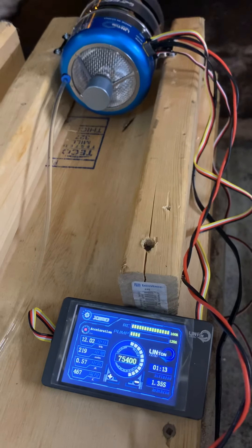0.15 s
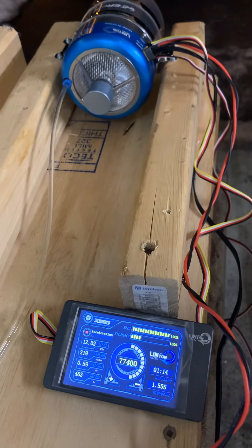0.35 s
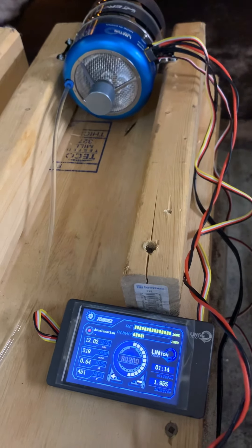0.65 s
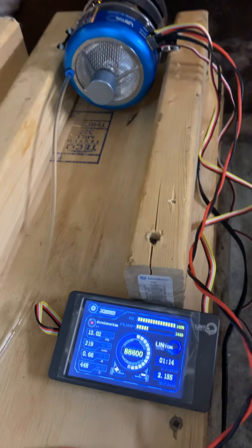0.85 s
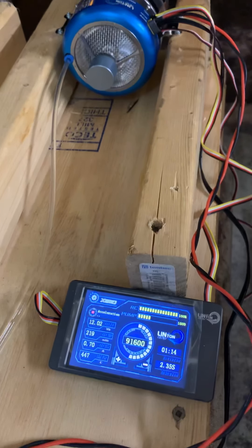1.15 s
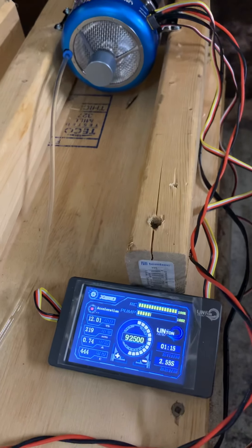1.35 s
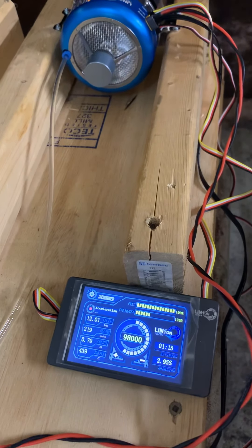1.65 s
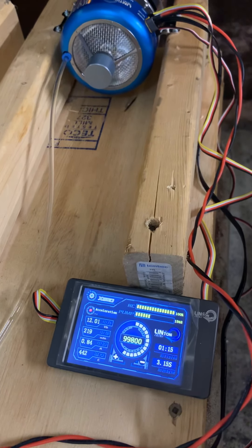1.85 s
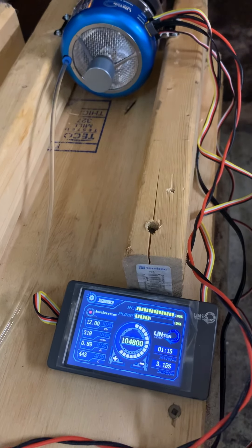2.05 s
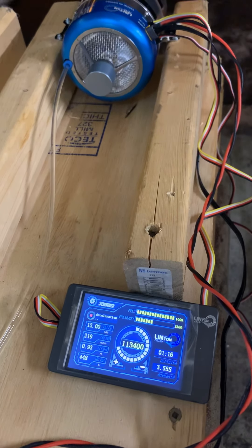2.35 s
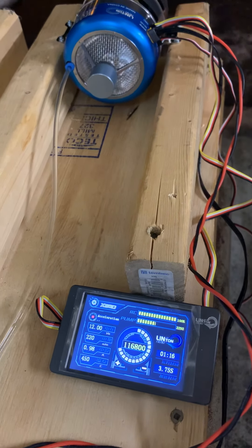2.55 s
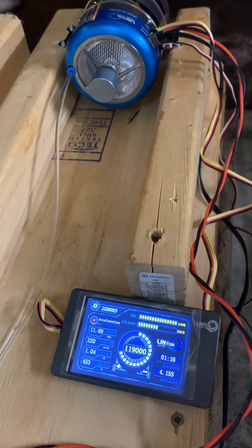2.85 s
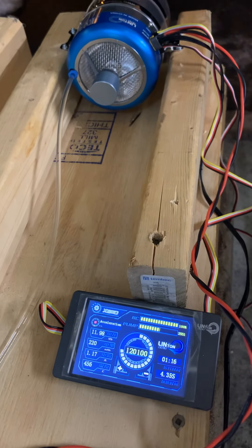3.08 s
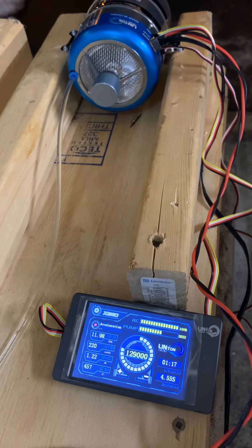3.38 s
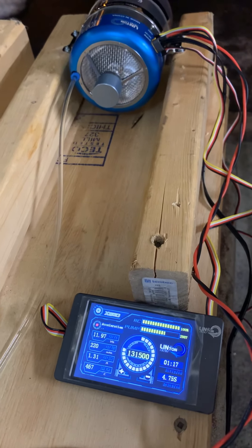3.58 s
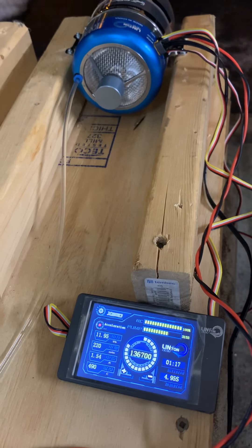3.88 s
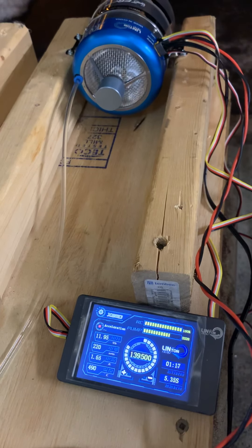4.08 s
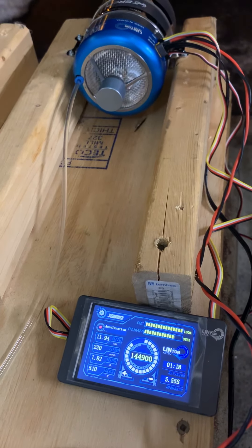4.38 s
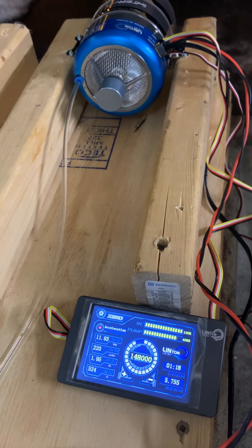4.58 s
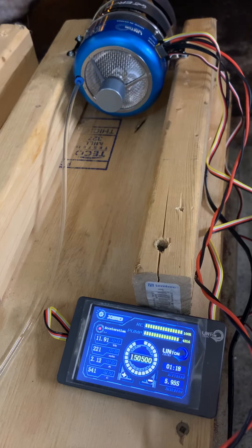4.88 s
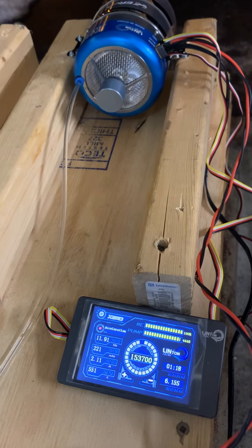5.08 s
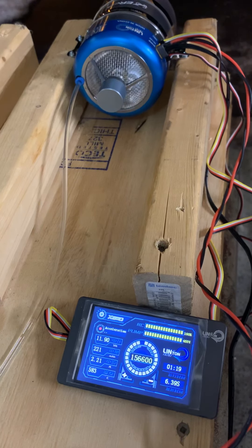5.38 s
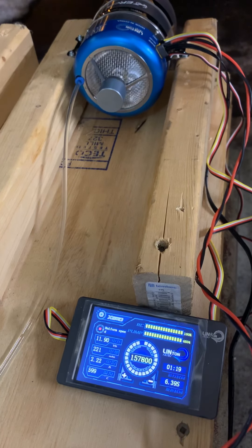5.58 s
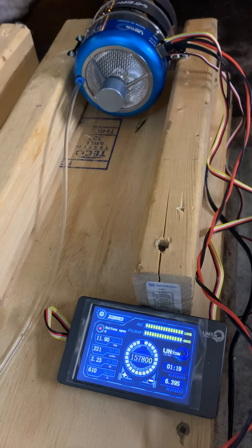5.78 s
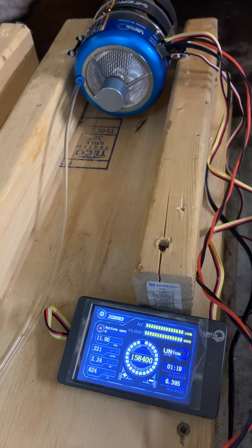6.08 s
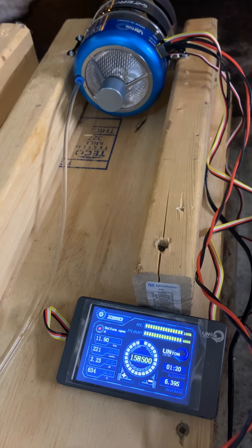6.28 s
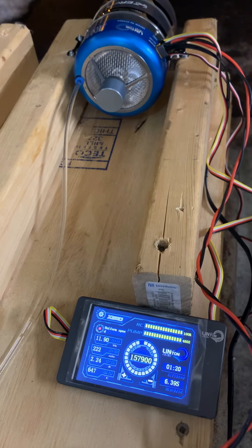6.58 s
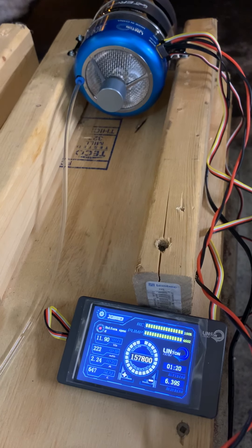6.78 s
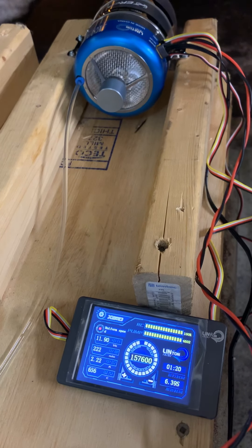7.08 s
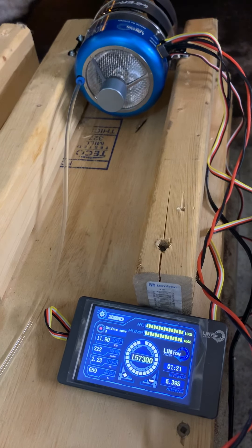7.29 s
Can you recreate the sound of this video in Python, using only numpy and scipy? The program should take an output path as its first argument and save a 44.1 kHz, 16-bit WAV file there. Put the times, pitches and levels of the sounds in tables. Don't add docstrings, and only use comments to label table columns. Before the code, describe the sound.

Thin turbine whine rises steadily over hissing intake air and a faint hum, then swells into a broad, steady jet roar at full power.

```python
import sys
import numpy as np
from scipy import signal
from scipy.fft import rfft, irfft, next_fast_len
from scipy.io import wavfile
from scipy.ndimage import uniform_filter1d, map_coordinates

SR = 44100
rng = np.random.default_rng(int(sys.argv[2]) if len(sys.argv) > 2 else 0)


def voltage_ratio(decibels):
    exponent = np.asarray(decibels, float) / 20
    return 10 ** exponent


def put_to_file(sound):
    columns = np.atleast_2d(sound).T
    safe = np.clip(columns, -1, 1)
    whole_steps = np.round(safe * 32767)
    wavfile.write(sys.argv[1], SR, whole_steps.astype(np.int16))


N = 328104
T = np.arange(N) / SR

# rumble, jet body, jet top, intake hiss (frequency [Hz])
EDGES_HZ = (600, 4500, 7950, 15900)


def unit(x):
    return x / np.sqrt(np.mean(x ** 2) + 1e-20)


def wobble(rate):
    return map_coordinates(rng.standard_normal(int(N * rate / SR) + 4), [T * rate])


def against(x, points):
    return np.interp(x, *np.transpose(points))


def bells(x, centre, width, height):
    return sum(h * np.exp(-((x - c) / w) ** 2) for c, w, h in zip(centre, width, height))


def filtered(x, response):
    m = next_fast_len(N + 8192)
    return irfft(rfft(x, m) * response(np.fft.rfftfreq(m, 1 / SR)), m)[..., :N]


def white():
    return rng.standard_normal(N)


def turbulence(patchy_db, streaky_db):
    z = signal.stft(rng.standard_normal((2, N)), nperseg=2048)[2]

    def smooth(wide, long):
        field = uniform_filter1d(rng.standard_normal(z.shape[1:]), size=wide, axis=0)
        return unit(uniform_filter1d(field, size=long, axis=1))

    gain = voltage_ratio(patchy_db * smooth(30, 3) + streaky_db * smooth(2, 5))
    return signal.istft(z * gain, nperseg=2048)[1][:, :N]


def shaped(noise, spectrum, lo_hz, hi_hz):
    f, db = np.transpose(spectrum)

    def colour(hz):
        return voltage_ratio(np.interp(np.log(hz + 1), np.log(f), db)) * (hz >= lo_hz) * (hz < hi_hz)

    return unit(filtered(noise, colour))


def blend(a, b, start, end):
    share = np.clip((T - start) / (end - start), 0, 1)
    return (1 - share) * a + share * b


def speed():
    # (time [s], shaft speed [Hz])
    throttle = [(0.02, 1259), (0.2, 1293), (0.5, 1372), (0.82, 1488), (0.98, 1526), (1.22, 1538),
                (1.47, 1658), (1.63, 1658), (1.97, 1808), (2.42, 1941), (2.76, 2004), (2.92, 1995),
                (3.0, 2039), (3.17, 2149), (3.37, 2138), (3.57, 2240), (3.7, 2232), (5.6, 2630)]
    return uniform_filter1d(against(T, throttle), size=3500)


def rings(hz, table, faint_db=-60):
    centre, width, db = np.transpose(table)
    return voltage_ratio(faint_db) + bells(hz, centre, width, voltage_ratio(db))


def intake_hiss(hz, power_db, gulp, surge):
    # (frequency [Hz], level [dB])
    slow_colour = [(8300, -2.6), (9500, -0.2), (10500, 0.0), (12000, -3.7), (13000, -5.1), (13800, -5.3),
                   (14600, -7.4), (15400, -9.4)]
    fast_colour = [(8300, -0.6), (9500, -0.8), (10500, -2.6), (11300, -3.2), (12000, -2.3), (13000, -1.2),
                   (13850, 1.6), (14300, -0.8), (14800, -0.6), (15500, -5)]
    # (shaft speed [Hz], level [dB])
    hiss_by_speed = [(1870, 6.84), (2010, 4.6), (2145, 3.3), (2210, 4.8), (2320, 4.4), (2450, 3.3),
                     (2580, 2.8), (2630, 3.3)]
    high, end = EDGES_HZ[2:]
    noise = turbulence(patchy_db=0.5, streaky_db=2.0)
    hiss = blend(shaped(noise, slow_colour, high, end), shaped(noise, fast_colour, high, end), 1.6, 3.8)
    hiss_db = power_db + against(hz, hiss_by_speed) - gulp
    return voltage_ratio(hiss_db + 1.1 * surge) * hiss


def combustor_rumble(hz, power_db, dip, surge):
    # (frequency [Hz], level [dB])
    hum_colour = [(30, -41), (50, -20.5), (100, -17), (125, -14.5), (142, -2.5), (160, -10), (205, -9.5),
                  (230, -5.5), (270, -11.5), (315, -4.5), (345, 0.5), (385, -7), (520, -4.5), (650, -3.5)]
    roar_colour = [(30, -23), (50, -4.5), (80, 1), (110, -1.4), (145, -0.5), (200, 0.2), (270, -1),
                   (345, -0.3), (420, -1), (520, -0.5), (650, -2.5)]
    # (shaft speed [Hz], level [dB])
    hum_by_speed = [(1260, -56.5), (1440, -50.5), (1530, -46.5), (1680, -43.5), (1950, -46.5), (2150, -48),
                    (2400, -47)]
    low, roar_s = EDGES_HZ[0], 4.805
    flame = turbulence(patchy_db=-0.07, streaky_db=1.5)
    hum = voltage_ratio(against(hz, hum_by_speed)) * shaped(flame, hum_colour, 15, low)
    calm_db = 1.5 * np.clip(T - 6.15, 0, None)
    roar = voltage_ratio(power_db - 9 - 1.6 * dip - calm_db) * shaped(flame, roar_colour, 15, low)
    return voltage_ratio(0.5 * surge) * blend(hum, roar, roar_s - .035, roar_s + 0.23)


def exhaust_jet(hz, jet_db, gulp, surge):
    # (frequency [Hz], level [dB])
    jet_colour = [(650, -2.9), (850, -3.6), (1150, -0.1), (1600, -0.2), (2000, -0.9), (2500, -0.7),
                  (3300, -1.0), (3900, -1.2), (4600, -1.5), (5500, -1.4), (6300, 0.2), (6900, 0.9),
                  (7700, 0.0)]
    # (shaft speed [Hz], level [dB])
    body_by_speed = [(1260, 4.5), (1540, 0.5), (1900, 1.5), (2050, 0), (2300, -0.5), (2450, -2), (2520, -1),
                     (2620, -0.3)]
    low, mid, high = EDGES_HZ[:3]
    full_db, body_hz = -26.5, 1360
    early_db = 7 * np.exp(-T / 0.81)
    top_db = full_db + 1.5 + 1.497 * (jet_db - full_db) - 0.062 * gulp + early_db
    noise = turbulence(patchy_db=0.93, streaky_db=2.5)
    body = shaped(noise, jet_colour, low, mid)
    body = body + (voltage_ratio(against(hz, body_by_speed)) - 1) * filtered(body, lambda f: f < body_hz)
    top = shaped(noise, jet_colour, mid, high)
    return voltage_ratio(jet_db + 0.13 * surge) * body + voltage_ratio(top_db + 0.32 * surge) * top


def airflow():
    # (time [s], level [dB])
    burner = [(0, -49), (.3, -46), (.6, -44), (.87, -42), (1.22, -40), (1.36, -36.5), (1.6, -35.5),
              (1.9, -36), (2.6, -35), (2.9, -36.5), (3.1, -34.5), (3.6, -32), (3.95, -32), (4.4, -31),
              (4.84, -31), (4.94, -28.5), (5.5, -28), (7.44, -27.5)]
    # (time [s], length [s], # exhaust
    # dip [dB], intake dip [dB])
    stumbles = [(.01, 0.14, 2.5, 8.5), (0.694, 0.092, 1.3, 8), (1.563, 0.14, 2.4, 4), (2.31, .03, 1, 2),
                (2.408, 0.061, 1.2, 1), (3.9, 0.014, 1, 8), (4.605, 0.027, 0, 1), (4.85, 0.044, 2, 7.5),
                (5.02, 0.029, 2.5, 6), (5.069, 0.012, 2.5, 5), (5.209, 0.013, 2, 6), (5.283, 0.042, 1.5, 3),
                (5.828, 0.098, 0.5, 1), (6.743, 0.055, 2, 3), (6.863, 0.022, 1.5, 3),
                (7.01, 0.042, 1.2, 3.5)]
    hz, power_db = speed(), against(T, burner)
    s, length, exhaust_db, intake_db = np.transpose(stumbles)
    dip, gulp = bells(T, s, length, exhaust_db), bells(T, s, length, intake_db)
    surge = 0.63 * wobble(6.4) + .5 * wobble(18)
    hiss = intake_hiss(hz, power_db, gulp, surge)
    rumble = combustor_rumble(hz, power_db, dip, surge)
    return hiss + rumble + exhaust_jet(hz, power_db - dip, gulp, surge)


def rotor():
    # (shaft speed [Hz], level [dB])
    blade_by_speed = [(1260, -47), (1320, -42), (1420, -29.5), (1680, -28), (1870, -19), (2110, -22),
                      (2150, -28), (2240, -36)]
    halo_by_speed = [(1260, -48), (1530, -36.5), (1820, -33), (2200, -35.5)]
    # (tone [Hz], width [Hz], loss [dB])
    nulls = [(8900, 30, 13), (9050, 90, 8), (9480, 110, 9), (9860, 40, 13), (10200, 90, 5),
             (10670, 125, 16), (11030, 45, 6), (11780, 160, 9), (12190, 50, 9), (12850, 90, 15),
             (14000, 220, 3), (15030, 25, 10)]
    # (shaft speed [Hz], width [Hz], level [dB])
    shaft_rings = [(1620, 50, -52), (1840, 60, -51), (1975, 100, -44), (2095, 35, -49), (2205, 22, -57)]
    under_rings = [(1490, 30, -47), (1590, 50, -48), (1795, 50, -44), (1895, 30, -45), (1955, 40, -42),
                   (2060, 80, -57)]
    over_rings = [(1300, 20, -57), (1430, 40, -56), (1610, 30, -48), (1735, 35, -42), (1880, 60, -49)]
    blades, hz = 7, speed()
    turn = 2 * np.pi * np.cumsum(hz * (1 + 0.00024 * wobble(41.4))) / SR
    fade = voltage_ratio(-150 * np.clip(T - 3.75, 0, None))
    eddies = unit(filtered(white(), lambda f: 1 / (1 + (f / 350) ** 2)))
    blade_db = against(hz, blade_by_speed) - bells(blades * hz, *np.transpose(nulls))
    loudness = voltage_ratio(blade_db + 0.83 * wobble(30.1)) + voltage_ratio(against(hz, halo_by_speed)) * eddies
    blade = loudness * np.sin(blades * turn)
    shaft = rings(hz, shaft_rings) * voltage_ratio(2.0 * wobble(21.8)) * np.sin(turn)
    under = rings(hz, under_rings) * voltage_ratio(1.1 * wobble(12)) * np.sin((blades - 1) * turn)
    over = rings(hz, over_rings) * voltage_ratio(2.5 * wobble(36.5)) * np.sin((blades + 1) * turn)
    return np.sqrt(2) * fade * (blade + shaft + under + over)


def whistles(length=0.16):
    # (start frequency [Hz], end frequency [Hz], level [dB])
    lines = [
        (4950, 6100, -51),
        (8800, 9950, -44),
        (12800, 12050, -51),
        (13780, 14150, -50),
    ]
    bend = np.clip(T / length, 0, 1) ** 1.8
    gate = np.clip((length - T) / .012, 0, 1)
    total = np.zeros(N)
    for start_hz, end_hz, db in lines:
        phase = 2 * np.pi * np.cumsum(start_hz + (end_hz - start_hz) * bend) / SR
        total += voltage_ratio(db + 2.8 * wobble(32.0)) * np.sin(phase)
    return gate * total


def chamber():
    # (shaft speed [Hz], width [Hz], level [dB])
    sings = [(1336, 46, -57), (1522, 25, -51.5), (1730, 163, -50), (1944, 40, -47)]
    drones = [(1660, 45, -52), (1900, 120, -57)]
    hz = speed()

    def note(note_hz, width_hz):
        return unit(filtered(white(), lambda f: 1 / (1 + ((f - note_hz) / width_hz) ** 2)))

    def speaks(table):
        return rings(hz, table, -60) - voltage_ratio(-60)

    return speaks(sings) * note(348.5, 14) + speaks(drones) * note(143, 9)


def scene():
    # (frequency [Hz], likeness spooling up [0-1], likeness at full power [0-1],
    # lag of the right one [rad])
    ports = [(0, .995, .995, 0), (250, .97, .97, 0), (430, .95, .93, 0), (510, .9, .85, 0),
             (590, .6, .4, 0), (650, .3, .35, -3), (740, .3, .75, -3.1), (850, .25, .9, -3.1),
             (960, .2, .75, -2.7), (1300, .28, .1, -1), (1700, .45, .35, .3), (2100, .5, .2, .6),
             (2400, .5, .42, 2.4), (2700, .55, .66, 3.0), (3100, .6, .58, 2.9), (3800, .3, .22, 1.7),
             (4400, .62, .5, 2.7), (4950, .64, .66, 3.2), (5400, .64, .56, 3.7), (5800, .55, .5, 4.5),
             (6250, .72, .7, 5.35), (6880, .86, .86, 6.28), (9620, .86, .86, 9.42),
             (12400, .86, .86, 12.57), (14900, .88, .88, 15.7), (15800, .88, .88, 16.4)]
    # (time [s], spread of the bass
    bass_spread = [(0, 0.15, 0.5), (.3, 0.6, 0.2), (.6, 0.7, 0.7), (.9, 0.15, 0.75), (1.15, 0, 0.56),
                   (1.7, 0, 0.53), (2.3, 0, 0.13), (2.6, 0, 0.02), (6.4, 0, 0), (6.9, 0, 0.06),
                   (7.44, 0.7, .55)]
    # (time [s], length [s], loss [0-1])
    sway = [(.42, 0.037, 0.5), (.56, .05, 0.6), (0.716, .03, .5), (0.962, .07, 0.6), (1.27, .04, 0.4),
            (1.552, 0.064, 0.5), (1.82, .05, .45), (2.12, .04, 0.2), (2.4, 0.1, 0.3), (4.825, 0.091, 0.3),
            (5.45, 0.046, 0.1), (6.1, 0.043, 0), (6.65, 0.054, 0.2)]
    f, alike_slow, alike_fast, lag = np.transpose(ports)
    air = airflow()

    def heard(alike):
        def mix(hz):
            angle = np.arccos(np.clip(np.interp(hz, f, alike), 0, 1)) / 2
            return np.array([np.cos(angle), np.sin(angle)])
        return filtered(air, mix)

    same, other = blend(heard(alike_slow), heard(alike_fast), 4.45, 4.75)
    whistle = whistles()
    same = same + rotor() + whistle + chamber()

    s, spread, loss = np.transpose(bass_spread)
    deep_hz = 240
    bass = filtered(air[1], lambda hz: (hz >= deep_hz) * (hz < 560))
    deep = filtered(air[1], lambda hz: hz < deep_hz)
    wash = filtered(air[1], lambda hz: (hz > 4300) * (hz < 5600))
    other = other + np.interp(T, s, spread) * bass
    other = other + 1.2 * np.clip((.55 - T) / .12, 0, 1) * deep
    other = other + 1.1 * np.exp(-(T / .12) ** 2) * wash
    same = same - np.interp(T, s, loss) * filtered(same, lambda hz: (hz > 470) * (hz < 750))

    def delay(hz):
        return np.exp(.5j * np.outer([1, -1], np.interp(hz, f, lag)))

    pair = filtered(np.array([same + other, same - other]), delay)
    low_mids = filtered(pair.mean(axis=0), lambda hz: (hz > 560) * (hz < 930))
    lost = np.clip(bells(T, *np.transpose(sway)), 0, 1) * low_mids
    return pair + .45 * whistle - lost


def drop_weak_bands(x, low_db=-10.5, weak_db=-4.7, luck_db=0.35, low_luck_db=3.2):
    bands = np.r_[0, 8, 16, 120:196:12, 196:292:14, 292, 306, 320:737:16]
    # (time [s], near 5 kHz [dB], near 3 kHz [dB])
    shortage = [(0, -16, -6), (.11, -12, -5), (.18, 6, 2), (.28, 8, 8), (.34, 3.5, 1), (.42, 8, 5),
                (.5, 7, 5), (.57, 5, 1), (.61, -6, -3), (.76, -5, -3), (.8, 3, -1), (.85, 0, -1),
                (.92, 6, -1), (.98, 1.5, -1), (1.05, 8, -1), (1.14, 7, -1.5), (1.22, 4, -2), (1.32, 8, -2),
                (1.39, 2, -2), (1.46, 9.5, -2), (1.52, 6, -2), (1.6, 0, -2), (1.74, 2, -1), (1.79, 9, 3),
                (1.84, 7, 0), (1.9, 0, -1), (2.05, 3, 1), (2.2, 1, 0), (3.2, 1.5, 0), (3.35, 6, 0),
                (3.48, 0, 0), (3.6, 2, 0), (3.72, 8, 1), (3.82, 2, 1), (4.4, 1, 0), (4.88, -1, 0),
                (4.96, 7, 0), (5.04, 0, .5), (7.44, .5, .5)]
    # (time [s], edge [Hz])
    mono_below = [(0, 0), (.5, 0), (.6, 190), (1.1, 350), (1.4, 330), (2.3, 340), (2.6, 450), (3.0, 380),
                  (3.2, 440), (4.1, 440), (4.5, 380), (5.2, 370), (5.5, 320), (6.6, 330), (7.1, 230),
                  (7.44, 170)]
    # (time [s], length [s], kept from [Hz])
    spare = [
        (.39, .04, 15200),
        (.46, .045, 15200),
        (2.055, .035, 13000),
        (3.565, .05, 15300),
        (3.635, .04, 15300),
        (3.81, .03, 15200),
    ]
    sum_top, frays_from = 670, 680
    pair = np.pad([x[0] + x[1], x[0] - x[1]], ((0, 0), (150, 0))) / 2
    z = signal.stft(pair, window="cosine", nperseg=2048)[2]
    frames = (np.arange(z.shape[2]) * 1024 - 150) / SR
    width = np.diff(np.r_[bands, z.shape[1]])
    power = np.abs(z) ** 2 + 1e-20
    level = 10 * np.log10(np.add.reduceat(power, bands, axis=1) / width[:, None])
    steady = uniform_filter1d(level, size=3, axis=2)
    loud, loud_steady = level.max(axis=0), steady.max(axis=0)
    dice = rng.standard_normal(level.shape)
    luck = unit(uniform_filter1d(dice, size=2, axis=2))
    band = bands[:, None]
    treble = band > 280

    tonal = treble & (band < 670) & (band != 448) & (loud - np.roll(loud_steady, 4, axis=0) > 8)

    s, *short = np.transpose(shortage)
    short_db = np.where(band > 175, *[np.interp(frames, s, column) for column in short])
    restless = luck_db * (1 + 8 * (band > 620) * (band < 680)) * luck
    lead = steady - steady[::-1] + np.where(treble, restless, low_luck_db * dice)
    lead = lead + np.array([13 * tonal, 7 * tonal])
    treble_limit = weak_db - np.array([.8, 0])[:, None, None]
    short_of = np.where(treble, treble_limit, low_db + short_db) - lead - 99 * (band <= 104)

    loudest = np.maximum.accumulate(np.where(band > 550, loud, -200), axis=0)
    ahead = np.pad(loudest, ((0, 4), (0, 0)), "edge")[4:] - 7
    masked = (loud_steady + 3 * luck[0] - np.maximum(loudest, ahead) < -15.5) & ~tonal
    no_jump = level[1] < steady[1, -6:-2].mean(axis=0) + 6
    sum_ends = (band > sum_top) & (dice[0] < 9)
    frayed = (band > frays_from) & (luck[1] < -1.0) & no_jump
    masked = masked | np.array([sum_ends, frayed])

    spared = np.zeros(loud.shape, bool)
    for at, long, hz in spare:
        spared |= (np.abs(frames - at) < long / 2) & (band * SR / 2048 > hz) & (band < 730)
    kept = np.repeat(~((short_of > 0) | masked) | spared, width, axis=1)

    thin = np.repeat((short_of > -3 * np.where(treble, .6, 1)) & ~tonal, width, axis=1)
    strong = power > 1.3 * np.repeat(voltage_ratio(2 * level), width, axis=1)
    edge = against(frames, mono_below) + 42 * luck[1, 0]
    z[1] *= np.where(np.fft.rfftfreq(2048, 1 / SR)[:, None] < edge, voltage_ratio(-34), 1)
    z = z * kept * np.where(thin, voltage_ratio(1.9) * strong, 1)
    pair = signal.istft(z, window="cosine", nperseg=2048)[1][:, 150:N + 150]
    return np.array([pair[0] + pair[1], pair[0] - pair[1]])


def roll_off(x):
    return signal.sosfilt(signal.butter(12, 15900, fs=SR, output="sos"), x)


def record(dry):
    mix = drop_weak_bands(dry)
    return roll_off(mix)


dry = scene()
out = record(dry)
put_to_file(out)
```